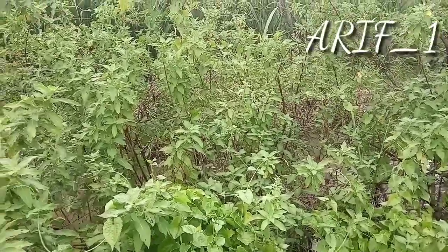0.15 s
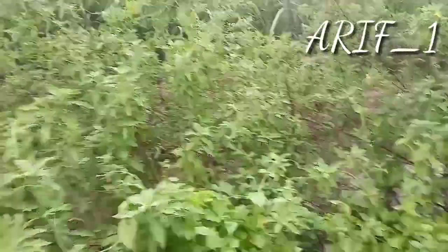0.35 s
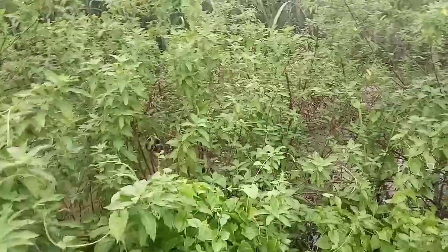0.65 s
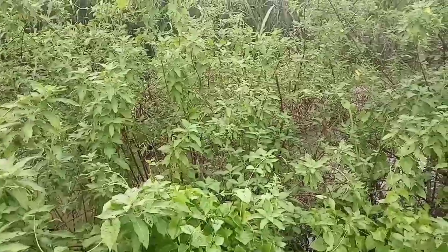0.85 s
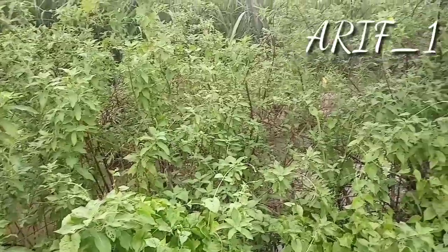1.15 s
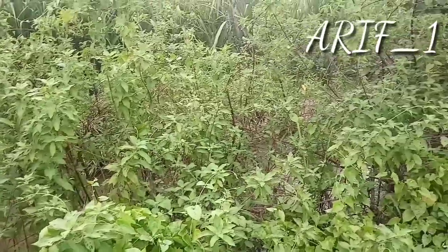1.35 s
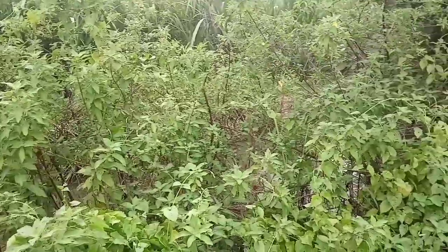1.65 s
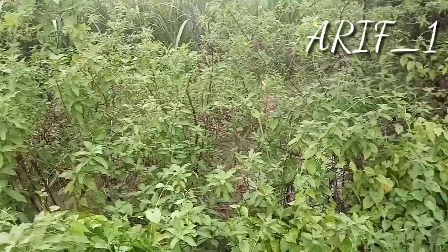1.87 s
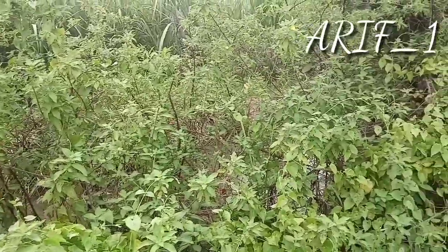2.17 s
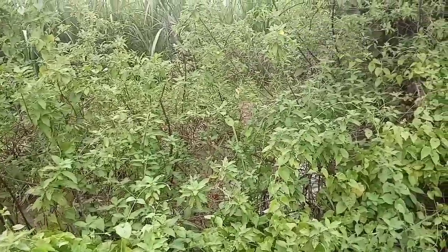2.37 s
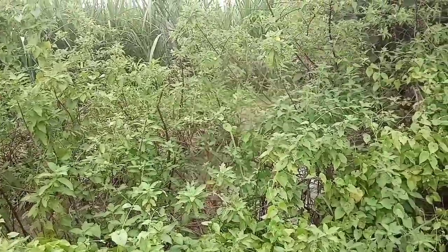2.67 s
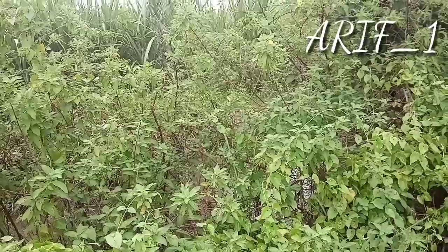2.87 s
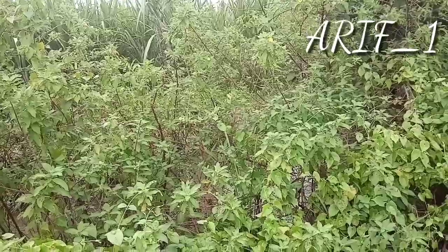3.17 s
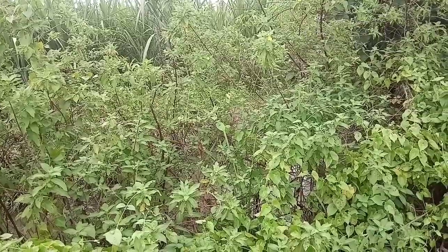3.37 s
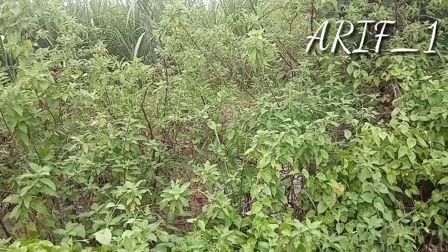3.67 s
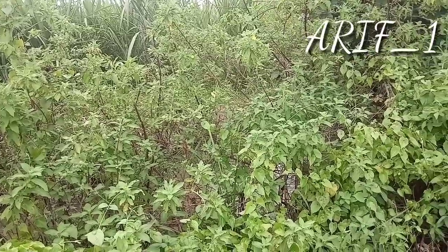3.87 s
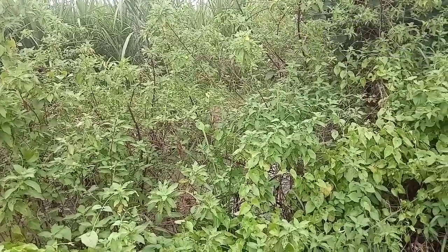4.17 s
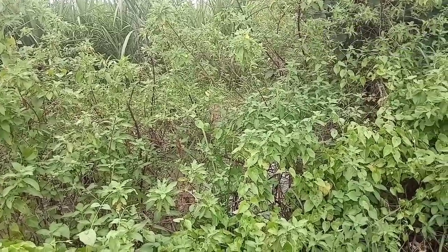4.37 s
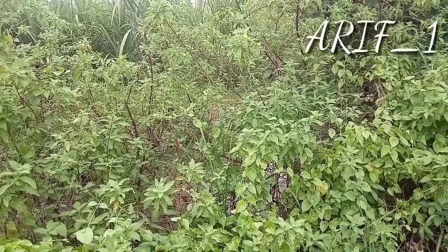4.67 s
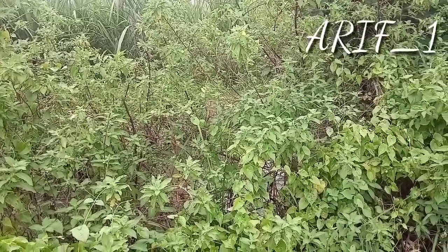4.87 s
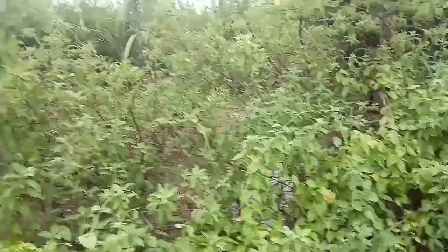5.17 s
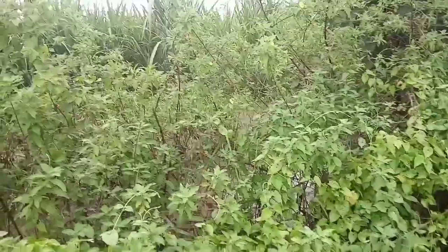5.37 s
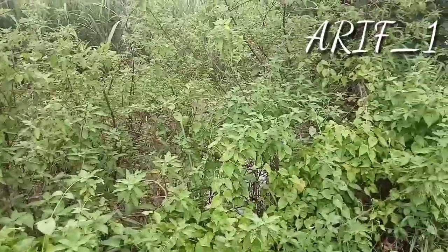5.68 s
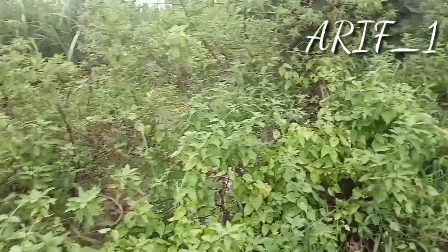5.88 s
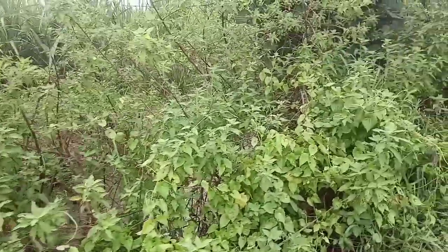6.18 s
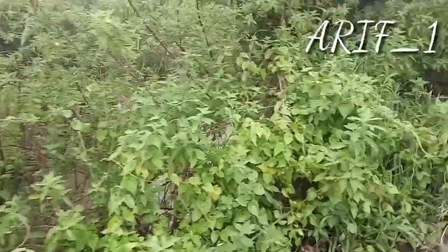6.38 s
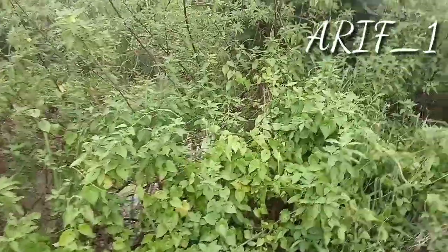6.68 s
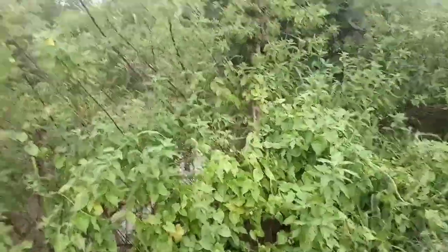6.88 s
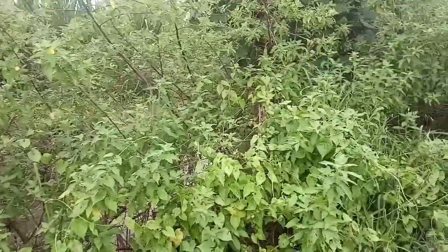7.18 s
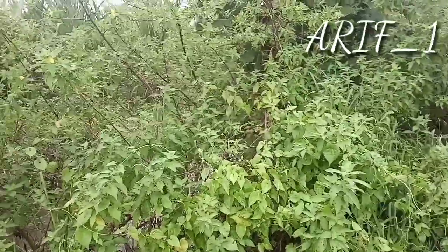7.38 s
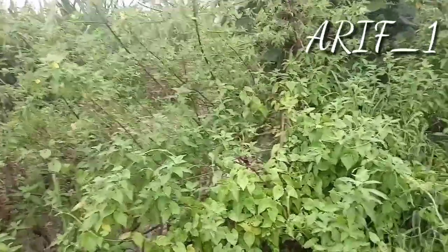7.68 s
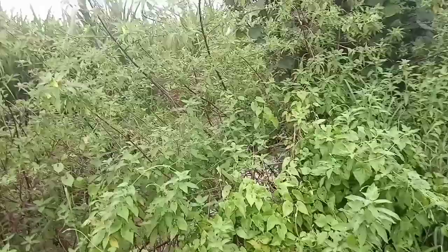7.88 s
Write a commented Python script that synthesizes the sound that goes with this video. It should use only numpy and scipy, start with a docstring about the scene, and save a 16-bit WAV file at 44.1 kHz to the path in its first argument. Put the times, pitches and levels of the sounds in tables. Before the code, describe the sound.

Crickets shrill and a small bird whistles upward over faint river wash, as a distant low engine slows to uneven thuds, then begins picking up.

```python
"""Riverside scrub with a far engine

A small bird repeats short up-slurred whistles while others answer: gliding sines with a scattered tail.
One cricket chirps in front of others and an insect chorus: short tones and flickering noise bands.
Far off a slow thumping engine slows further, picking up at the end: pulses ring its exhaust modes.
A dull drone swells and fades; hand or cloth rustles and small handling clicks sound near the microphone,
over a steady river wash mottled by faint random gliding blips."""
import sys
import numpy as np
from scipy import signal
from scipy.fft import rfft, irfft
from scipy.io import wavfile
from scipy.ndimage import map_coordinates

SR = 44100
rng = np.random.default_rng(int(sys.argv[2]) if len(sys.argv) > 2 else 0)


def unload_audio(sound):
    """Save the sound as a 16-bit wav file, at the path given as the first command line argument."""
    columns = np.transpose(np.atleast_2d(sound))
    # keep every value between -1 and 1, then stretch to whole-number steps
    steps = np.round(np.clip(columns, -1, 1) * 32767)
    wavfile.write(sys.argv[1], SR, steps.astype(np.int16))


N = 354431
TIME = np.arange(N) / SR


def birds():
    """All the singers together, from the near warbler to the far hoots."""
    return warbler() + buzzy_bird() + chipping_birds() + hoots()


def warbler():
    """Each whistle climbs in pitch as it swells, then dies away on its top pitch."""
    # Each row: start in seconds, loudest moment in seconds, first pitch in Hz, top pitch in Hz,
    # level at the loudest in dB, lead-in in dB under that.
    slurs = [(0.202, .272, 3110, 4054, -53, 18), (0.458, 0.546, 3390, 4110, -62.5, 4),
             (1.424, 1.483, 3640, 4250, -57.5, 11), (1.754, 1.81, 3400, 4020, -62, 6),
             (2.0, 2.046, 3530, 4045, -58, 1.5), (2.242, 2.298, 3370, 4070, -54.5, 14.5),
             (2.494, 2.551, 3880, 4070, -57.5, 4), (2.693, 2.771, 3200, 4086, -58, 8.5),
             (2.913, 2.994, 3140, 4106, -58, 19), (3.139, 3.234, 3200, 4015, -60.5, 9.5),
             (3.375, 3.46, 3000, 4124, -60.5, 7.5), (3.595, 3.68, 3060, 4020, -56, 11),
             (3.8, 3.882, 2920, 3993, -52, 14.5), (4.021, 4.105, 2980, 4120, -56, 10.5),
             (4.265, 4.344, 2800, 4110, -56.5, 7.5), (4.482, 4.571, 3010, 4070, -54, 5.5),
             (4.688, 4.797, 2950, 4036, -55.5, 18), (4.932, 5.01, 3000, 4150, -51.5, 14.5),
             (6.722, 6.785, 3480, 3976, -54.5, 8.5), (6.926, 7.021, 3350, 3965, -57, 14.5),
             (7.163, 7.251, 2920, 4080, -49.5, 19.5), (7.447, 7.494, 4120, 4393, -53, 7)]
    shoulder_share, shoulder_pitch = .62, .75   # shares of the rise in time and in pitch done at the lead-in
    onset_db = 14.5   # start under the lead-in
    fall_s, fall_db = .031, 27
    notes = []
    for start, peak, first_hz, top_hz, db, lead_db in slurs:
        shoulder_s = start + shoulder_share * (peak - start)
        shoulder_hz = first_hz + shoulder_pitch * (top_hz - first_hz)
        notes.append([(start, first_hz, db - lead_db - onset_db),
                      (shoulder_s, shoulder_hz, db - lead_db),
                      (peak, top_hz, db),
                      (peak + fall_s, top_hz, db - fall_db)])
    return whistles(notes, flutter_db=5, flutter_hz=65, waver=.015, fade_s=.012)


def buzzy_bird():
    """A higher bird whose fast flutter of level and pitch makes its notes buzz."""
    # Each row: loudest moment in seconds, rise in seconds, fall in seconds, level at the loudest in dB.
    buzzes = [(1.9, 0.092, 0.065, -56.5), (2.455, .045, 0.057, -72.5), (4.981, 0.091, 0.064, -57.5),
              (5.915, 0.049, .045, -70.5), (7.08, .08, 0.06, -55.5), (7.265, 0.052, 0.087, -58)]
    rise_db, fall_db = 15.5, 33
    notes = [[(s - rise, 4830, db - rise_db), (s, 4850, db), (s + fall, 4930, db - fall_db)]
             for s, rise, fall, db in buzzes]
    return whistles(notes, flutter_db=4, flutter_hz=260, waver=.025, fade_s=.015)


def chipping_birds():
    """Chips and thin high whistles, level, falling or rising, each on a straight glide."""
    # Each row: loudest moment in seconds, rise in seconds, fall in seconds, first pitch in Hz,
    # last pitch in Hz, level at the loudest in dB.
    calls = [(.648, .012, .045, 3420, 3260, -77), (1.532, .01, .02, 4510, 3770, -62.5),
             (1.545, 0.02, 0.019, 3520, 3490, -69.5), (1.803, 0.0089, 0.0152, 4600, 3810, -60.5),
             (2.48, 0.038, 0.026, 5500, 7140, -64), (2.53, .03, .03, 6000, 6100, -74),
             (2.55, .015, .02, 3350, 3250, -73), (2.73, 0.033, .05, 4260, 4360, -76),
             (3.795, .01, .015, 5500, 4600, -73), (3.9, .025, 0.029, 5860, 5830, -72),
             (4.58, .02, .03, 6130, 6100, -74), (4.716, .03, 0.03, 3040, 3000, -67),
             (4.8, .015, .025, 6250, 6200, -77), (5.28, .08, 0.066, 3930, 3750, -61.5),
             (5.52, 0.072, 0.042, 3805, 3870, -58), (7.727, .038, 0.028, 3820, 3735, -56.5),
             (7.935, 0.027, .055, 3800, 3340, -61), (7.984, .015, 0.052, 3335, 3324, -64),
             (2.9, .05, .03, 10600, 11300, -83), (2.97, .035, 0.034, 11500, 10300, -86),
             (5.25, 0.046, .03, 10800, 12600, -81), (5.36, .015, .03, 13000, 12000, -84)]
    rise_db, fall_db = 9.5, 16.5
    notes = []
    for s, rise, fall, first_hz, last_hz, db in calls:
        peak_hz = (fall * first_hz + rise * last_hz) / (rise + fall)
        notes.append([(s - rise, first_hz, db - rise_db), (s, peak_hz, db), (s + fall, last_hz, db - fall_db)])
    return whistles(notes, flutter_db=4, flutter_hz=70, waver=.015, fade_s=.012)


def hoots():
    """Far, low calls glide evenly and flutter slowly."""
    # Each row: start in seconds, end in seconds, first pitch in Hz, last pitch in Hz, level in dB.
    calls = [(1.857, 1.926, 716, 674, -72), (2.668, 2.795, 686, 670, -77), (3.192, 3.56, 672, 688, -75.5),
             (3.425, 3.555, 499, 512, -71.5), (4.323, 4.417, 763, 838, -76),
             (4.574, 4.676, 684, 690, -78.5), (6.818, 6.923, 623, 563, -76), (7.853, 8.105, 600, 676, -70),
             (.33, 0.39, 2190, 2200, -82.5), (1.214, 1.285, 1750, 1700, -80),
             (2.03, 2.066, 1528, 1450, -78), (2.493, 2.565, 1640, 1626, -75.5),
             (2.697, 2.767, 1640, 1600, -80), (2.864, 2.955, 1605, 1630, -79.5),
             (3.515, 3.544, 1435, 1397, -76.5), (3.955, 4.191, 1654, 1590, -78.5),
             (4.501, 4.589, 1674, 1570, -77.5), (5.552, 5.675, 2150, 1930, -82.5),
             (6.583, 6.638, 1400, 1030, -79.5)]
    notes = [[(start, first_hz, db), (end, last_hz, db)] for start, end, first_hz, last_hz, db in calls]
    return whistles(notes, flutter_db=3.5, flutter_hz=18, waver=.011, fade_s=.05)


def scrub(x):
    """Leaves and stems scatter a dense short tail."""
    t60_s, tail_db = .15, -2.5
    t = TIME[:SR // 2]
    tail = rng.standard_normal(len(t)) * amp(-60 * t / t60_s) * np.minimum(t / .0039, 1)
    return x + amp(tail_db) * signal.fftconvolve(x, tail / np.sqrt(np.sum(tail ** 2)))[:N]


def cricket():
    """Each wing stroke of the front cricket is a short tone whose pitch sags a little."""
    # Each row: first wing stroke in seconds, last wing stroke in seconds, stroke level in dB.
    bouts = [(0.164, 0.264, -51.5), (0.382, 0.63, -49), (0.677, 1.013, -50.5), (1.323, 1.365, -57),
             (1.511, 1.689, -59), (1.967, 2.165, -55.5), (2.213, 2.419, -49.5), (2.622, 2.821, -48.5),
             (3.017, 3.22, -48), (3.369, 3.524, -48), (3.673, 3.868, -47.5), (4.022, 4.373, -47),
             (4.573, 4.871, -48.5), (5.118, 5.273, -49), (5.425, 5.576, -49.5), (5.776, 6.077, -48),
             (6.23, 6.277, -52), (6.377, 6.683, -52), (6.872, 6.973, -53), (7.027, 7.439, -49.5),
             (7.741, 7.935, -47.5)]
    wing_hz, stroke_s = 7955, .05   # stroke spacing, rounded to fit each bout
    strokes, t = np.zeros(N + SR), TIME[:SR // 20]
    for first, last, db in bouts:
        times = np.linspace(first, last, round((last - first) / stroke_s) + 1)
        for s, (detune, longer, louder) in zip(times, rng.standard_normal((len(times), 3))):
            attack = np.sin(np.pi / 2 * np.minimum(t / .014, 1))
            decay = np.exp(-(t / (.023 * (1 + .08 * longer))) ** 3)
            tone = np.sin(2 * np.pi * wing_hz * (1 + .0014 * detune - .21 * t) * t)
            strokes[round((s - .003) * SR):][:len(t)] += amp(db + 1.3 * louder) * attack * decay * tone
    return strokes[:N] * amp(.75 * drift(140))   # file teeth catch unevenly


def engine():
    """Under load a steady hum on the firing rate; under it uneven thumps into the exhaust modes."""
    # Each row: time in seconds, engine level in dB ahead of the hum and load offsets.
    level_curve = [(0, -47), (3.1, -44.5), (3.7, -46.5), (4.05, -51.5), (4.25, -47.5), (5.3, -50), (6, -55),
                   (6.38, -48), (7.3, -52.5), (7.8, -49.5), (8.0, -45)]
    hum_db, loaded_thump_db = -2.5, -6.5   # against the engine level
    closed_s, closing_s = 3.905, .28   # throttle fully closed; time it takes to close
    level_db, = in_time(level_curve)
    per_s, turns = firings()
    loaded = np.clip((closed_s - TIME) / closing_s, 0, 1)
    hum = amp(level_db + hum_db) * loaded * engine_hum(turns)
    return hum + amp(level_db + loaded_thump_db * loaded) * exhaust_thumps(per_s, turns, loaded)


def firings():
    """Firing rate per second and the running count of firings."""
    # Each row: time in seconds, firings per second.
    speed = [(0.0, 28.08), (1.5, 27.65), (3.1, 26.28), (3.75, 24.77), (4.05, 22.96), (4.8, 21.57),
             (5.7, 18.09), (6.15, 17.37), (6.45, 15.11), (7.1, 12.8), (7.3, 14.43), (7.65, 14.59),
             (8.04, 18.21)]
    per_s, = in_time(speed)
    return per_s, np.cumsum(per_s) / SR + .2935


def engine_hum(turns):
    """Harmonics of the firing rate, each wandering in level and phase."""
    # Each row: multiple of the firing rate, relative level in dB.
    harmonics = [(2, -24), (3, -10.5), (4, -7.5), (5, 0), (6, -11), (7, -30), (8, -36)]
    return sum(np.sqrt(2) * amp(db + 1.6 * drift(3)) * np.cos(2 * np.pi * order * turns + .3 * drift(3))
               for order, db in harmonics)


def exhaust_thumps(per_s, turns, loaded):
    """Each firing strikes the exhaust modes with uneven timing and force; rms 1."""
    # Each row: mode in Hz, width of its first pass in Hz, relative level in dB,
    # change with the throttle closed in dB.
    modes = [(60.5, 31, -18, -2), (82.6, 22.4, -4.5, -0.4), (112.5, 11.16, -2.5, 1.5), (138.6, 18, 0, 1),
             (186.5, 42, -4, -1.5), (200, 140, -32.5, 3)]
    swell_width = 1.8   # each mode swells before it dies: width of a second pass, in mode widths
    at = np.flatnonzero(np.diff(np.floor(turns)))
    chance = rng.standard_normal((len(at), 2 + len(modes)))
    at = np.clip(at + (.0044 * SR * chance[:, 0]).astype(int), 0, N - 1)
    thumps = np.zeros(N)
    for k, (hz, width_hz, mode_db, closed_db) in enumerate(modes):
        uneven_db = 1.83 * chance[:, 1] + 3.37 * chance[:, 2 + k]   # whole firing, then this mode alone
        pulses = np.zeros(N)
        pulses[at] = amp(closed_db * (1 - loaded[at]) + uneven_db) / np.sqrt(per_s[at])
        ringing = resonance(resonance(pulses, hz, width_hz), hz, swell_width * width_hz)
        thumps += (-1) ** k * amp(mode_db) * ringing / width_hz
    # each puff leaves the pipe over some milliseconds
    thumps = signal.fftconvolve(thumps, np.hanning(SR // 150))[:N]
    # banks and trees smear it
    t = TIME[:SR // 12]
    echo = rng.standard_normal(SR // 12) * amp(-60 * t / .084)
    smeared = signal.fftconvolve(thumps, echo)[:N]
    return rms_one(rms_one(thumps) + amp(-3) * rms_one(smeared))


def drone():
    """A dull swelling drone: noise in two groups of narrow resonances, throbbing in step with the engine."""
    # Each row: time in seconds, low band level in dB, high band level in dB.
    swell = [(0, -71, -79), (.24, -78, -74.5), (.36, -63.5, -63.5), (.57, -66, -69), (.65, -67, -86),
             (.74, -63.5, -70), (1.12, -67.5, -70.5), (1.25, -75.5, -84.5), (1.8, -78.5, -87.5),
             (3.5, -75, -90), (3.65, -83.5, -92), (5.6, -92, -92.5)]
    # Each row of both: resonance in Hz, width of each of two passes in Hz, relative level in dB.
    low_modes = [(341, 45, -7), (433, 27.5, -0.5), (517, 93, -2.5)]
    high_modes = [(712, 38, -18), (791, 45, -6), (881, 53, 1), (993, 74, -8)]
    waver_db, throb_depth, throbs_per_firing = 2.5, .26, 3
    out = 0
    for db, modes in zip(in_time(swell), (low_modes, high_modes)):
        band = sum(amp(mode_db + waver_db * drift(5)) * ringing_noise(hz, width_hz)
                   for hz, width_hz, mode_db in modes)
        out = out + amp(db) * rms_one(band)
    throb = 1 + throb_depth * np.cos(2 * np.pi * throbs_per_firing * firings()[1])
    return out * rms_one(throb) * window(swell, .074)


def rustles():
    """Hand or cloth rustles near the microphone: noise whose bands flicker fast, together and apart."""
    # Each row: full level reached in seconds, rise in seconds, hold in seconds, fall in seconds, level in dB.
    strokes = [(5.25, .07, 0.092, .06, -75), (6.184, .075, 0.055, 0.038, -63),
               (7.318, .08, 0.28, .07, -67.5), (7.78, 0.11, 0.088, 0.037, -75.5)]
    # Each row: frequency in Hz, relative level in dB per Hz.
    rustle_spectrum = [(900, -16.5), (1800, -7), (2500, -3), (3100, -10), (3700, -2), (4600, -9),
                       (6000, -2), (7200, -11.5), (10000, -3.5), (15800, -17)]
    rise_db, fall_db = 14, 12
    grains = patchy(rustle_spectrum, patch_db=3, patch_hz=14, together=2.2 * drift(150) + 1.5 * drift(12))
    level = 0
    for s, rise, hold, fall, db in strokes:
        rows = [(s - rise, db - rise_db), (s, db), (s + hold, db), (s + hold + fall, db - fall_db)]
        level = level + amp(in_time(rows)[0]) * window(rows, .011)
    return level * grains


def clicks():
    """A small handling click near the microphone is a short bright burst over a duller one."""
    # Each row: time in seconds, bright level in dB ahead of the band gains, dull level in dB against it.
    hits = [(6.3485, -73, -18), (6.4333, -72, -16), (6.59, -59.5, -26), (6.6924, -71, 3), (6.9354, -72, 4),
            (7.0199, -74, -5), (7.1851, -51.5, -12), (7.3158, -65, 1), (7.3771, -65, -10), (7.4435, -69, 9),
            (7.5618, -64, 11), (7.7762, -74, -1), (7.8171, -58, -3)]
    bright_gain_db, dull_gain_db = 9, 7
    bright, dull = np.zeros((2, N))
    for s, db, dull_db in hits:
        bright[round(s * SR)] = amp(db)
        dull[round(s * SR)] = amp(db + dull_db)
    t = TIME[:SR // 20]
    burst = rng.standard_normal(len(t)) * (amp(-60 * t / .006) + .15 * amp(-60 * t / .04))
    high = signal.sosfilt(signal.butter(2, 9000, "high", fs=SR, output="sos"), burst)
    low = signal.sosfilt(signal.butter(2, [1500, 7000], "band", fs=SR, output="sos"), burst)
    bright_clicks = amp(bright_gain_db) * signal.fftconvolve(bright, high)[:N]
    return bright_clicks + amp(dull_gain_db) * signal.fftconvolve(dull, low)[:N]


def neighbours():
    """Crickets further off stroke in bouts, each at its own pitch and pace."""
    # Each row: pitch in Hz, strokes per second, level in dB.
    singers = [(7800, 21, -64), (7710, 20.6, -60), (8260, 18, -60), (8060, 63, -70)]
    out = 0
    for hz, per_s, db in singers:
        stroke = np.maximum(np.sin(2 * np.pi * (per_s * TIME + rng.random() + .15 * drift(1.5))), 0)
        bout = np.clip(1.07 + .71 * drift(1.3), 0, 1)
        tone = np.sin(2 * np.pi * hz * np.cumsum(1 + .0026 * drift(20)) / SR)
        out = out + amp(db + .79 * drift(44)) * stroke * bout * tone
    return out


def insects():
    """Many far insects blend into flickering noise bands."""
    # Each row: frequency in Hz, relative level in dB per Hz.
    chorus_spectrum = [(7250, -26.5), (7550, -21.5), (7780, -4.5), (7950, -1), (8100, -4), (8290, -5.5),
                       (8450, -9), (8700, -42), (8900, -49)]
    # Each row: time in seconds, low insects in dB ahead of a 2.5 dB lift, high insects in dB.
    level_curve = [(0.0, -64, -87), (0.65, -64.5, -82.5), (3.76, -65, -83), (7.74, -64.5, -74.5),
                   (8.04, -67.5, -76.5)]
    # Each row: band centre in Hz, width of each of two passes in Hz, relative level in dB.
    high_bands = [(9815, 450, 3.5), (10340, 540, 0)]
    low_db, high_db = in_time(level_curve)
    low = shaped(rng.standard_normal(N), chorus_spectrum) * amp(low_db + 2.5 + 1.3 * drift(24))
    high = sum(amp(db + 2 * drift(8) + 2.85 * drift(30)) * ringing_noise(hz, width_hz)
               for hz, width_hz, db in high_bands)
    return low + amp(high_db) * rms_one(high)


def far_blips():
    """Faint random gliding blips that mottle the background."""
    chance, t = rng.random((70, 5)), TIME[:SR // 10]
    out = np.zeros(N + len(t))
    for when, pitch, glide, length, level in chance:
        hz = 1300 * 2 ** (2.1 * pitch) * (1 + 6.4 * (glide - .5) * t)
        shape = np.sin(np.pi * np.clip(t / (.022 + .064 * length), 0, 1)) ** 2
        tone = np.sin(2 * np.pi * np.cumsum(hz) / SR)
        out[int(when * N):][:len(t)] += amp(-87.5 + 8 * level) * shape * tone
    return out[:N]


def air():
    """Steady river wash, and a low far rumble: gently flickering and slowly drifting noise."""
    # Each row: frequency in Hz, relative level in dB per Hz.
    wash_spectrum = [(190, 5.5), (290, -11.5), (600, -17), (1170, -24.5), (1800, -20), (3000, -25.5),
                     (6500, -27.5), (9000, -28.5), (12000, -34), (15800, -34.5)]
    wash = patchy(wash_spectrum, patch_db=1.6, patch_hz=8, together=.4 * drift(1.5))
    rumble = shaped(rng.standard_normal(N), [(20, -20.5), (60, -4), (120, -.5), (190, -12)])
    return amp(-73.5) * wash + amp(-65 + 4.6 * drift(3)) * rumble


def whistles(notes, flutter_db, flutter_hz, waver, fade_s):
    """Sine notes, rows of (s, Hz, rms dB), whose level flutters and whose pitch wavers by a share."""
    out = np.zeros(N)
    flutter = amp(flutter_db * drift(flutter_hz))
    wobble = 1 + waver * drift(flutter_hz)
    for rows in notes:
        start, end = rows[0][0], rows[-1][0]
        part = np.abs(TIME - (start + end) / 2) < (end - start + fade_s) / 2
        hz, db = (column[part] for column in in_time(rows))
        tone = np.sin(2 * np.pi * np.cumsum(hz * wobble[part]) / SR)
        out[part] += np.sqrt(2) * amp(db) * window(rows, fade_s)[part] * tone
    return out * rms_one(flutter)


def patchy(spectrum, patch_db, patch_hz, together):
    """Noise in narrow bands, each flickering on its own over a shared gain in dB; rms 1."""
    edges = np.geomspace(spectrum[0][0], spectrum[-1][0], 22)
    base, out = rfft(shaped(rng.standard_normal(N), spectrum)), 0
    grid = np.fft.rfftfreq(N, 1 / SR)
    for low, high in zip(edges, edges[1:]):
        band = irfft(base * ((grid >= low) & (grid < high)), N)
        out = out + band * amp(patch_db * drift(patch_hz) + together)
    return rms_one(out)


def shaped(x, spectrum):
    """Colour x by a spectrum in dB per Hz, near silent outside it; rms 1."""
    hz, db = np.transpose(spectrum)
    grid = np.fft.rfftfreq(N, 1 / SR) + 1e-3   # keeps the logarithm finite at 0 Hz
    gain = amp(np.interp(np.log(grid), np.log(hz), db, -120, -120))
    return rms_one(irfft(rfft(x) * gain, N))


def ringing_noise(hz, width_hz):
    """Noise passed twice through one resonance."""
    return resonance(resonance(rng.standard_normal(N), hz, width_hz), hz, width_hz)


def resonance(x, hz, width_hz):
    """Two-pole resonance with gain 1 on top."""
    r = np.exp(-np.pi * width_hz / SR)
    feedback = [1, -2 * r * np.cos(2 * np.pi * hz / SR), r * r]
    return signal.lfilter(np.array([1, 0, -1]) * (1 - r * r) / 2, feedback, x + 1e-18)


def drift(rate_hz):
    """Smooth random wander up to about rate_hz; rms 1."""
    knots = rng.standard_normal(int(N / SR * rate_hz * 2) + 3)
    return rms_one(map_coordinates(knots, [TIME * rate_hz * 2], order=3))


def in_time(rows):
    """Columns of a curve, sample by sample; the first column is time in seconds."""
    s, *columns = np.transpose(rows)
    return [np.interp(TIME, s, c) for c in columns]


def window(rows, fade_s):
    """One while the curve lasts, fading at both ends."""
    return np.clip(np.minimum(TIME - rows[0][0], rows[-1][0] - TIME) / fade_s + .5, 0, 1)


def amp(db):
    """Decibels to gain."""
    return 10 ** (np.asarray(db) / 20)


def rms_one(x):
    """Scale to unit rms."""
    return x / np.sqrt(np.mean(x ** 2) + 1e-20)


def scene():
    """Birds and blips pass through the scrub; the rest is heard directly."""
    near = scrub(birds() + far_blips()) + cricket() + rustles() + clicks()
    far = engine() + drone() + neighbours() + insects() + air()
    return (near + far)[None]


def record(dry):
    """A steep low-pass cuts the top, 70 dB down from 15850 Hz."""
    return signal.sosfilt(signal.cheby2(24, 70, 15850, fs=SR, output="sos"), dry)


dry = scene()
out = record(dry)
unload_audio(out)
```